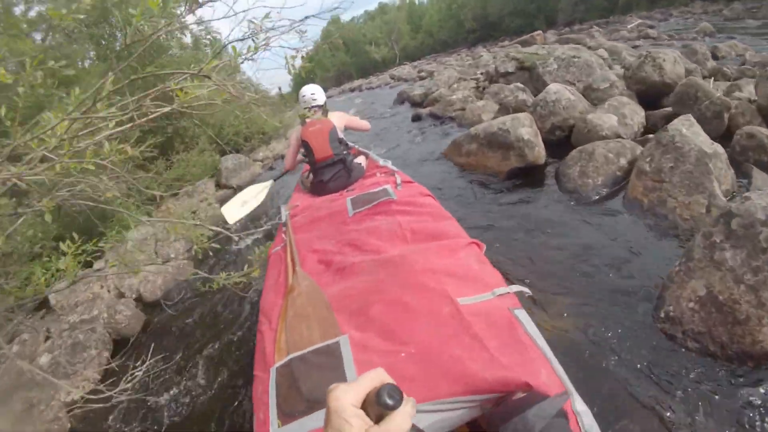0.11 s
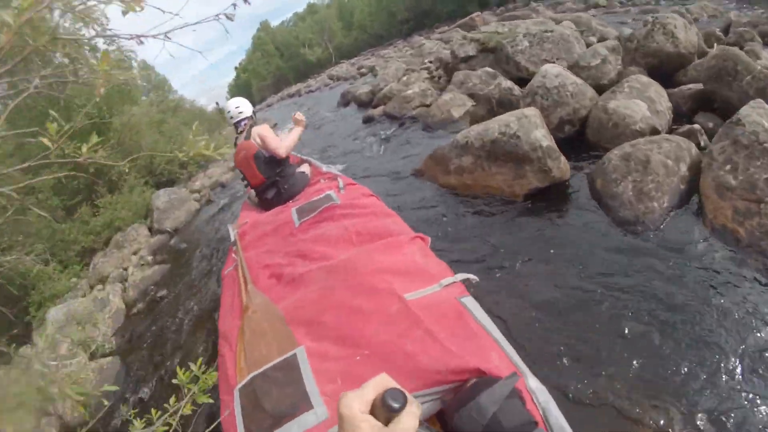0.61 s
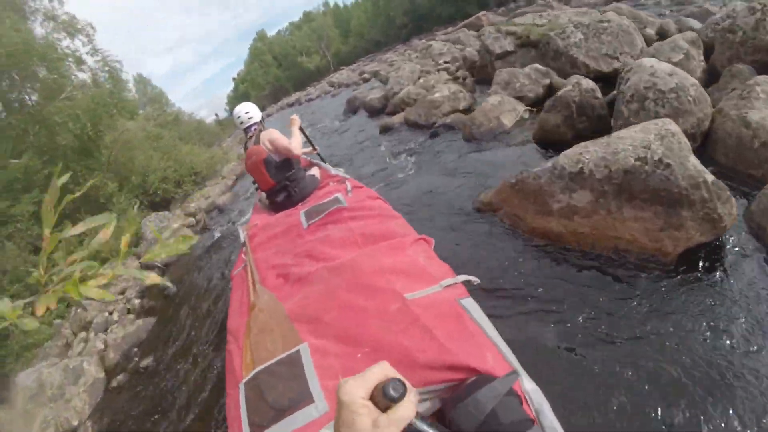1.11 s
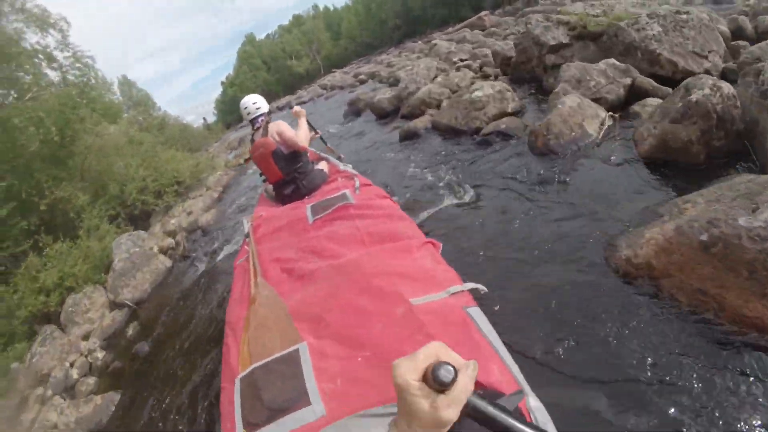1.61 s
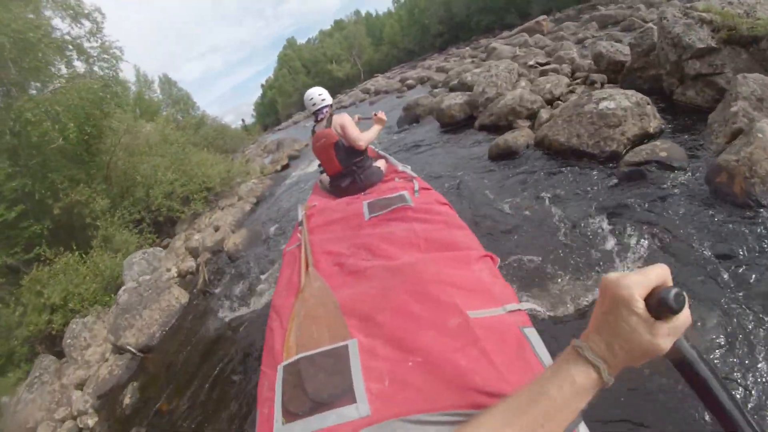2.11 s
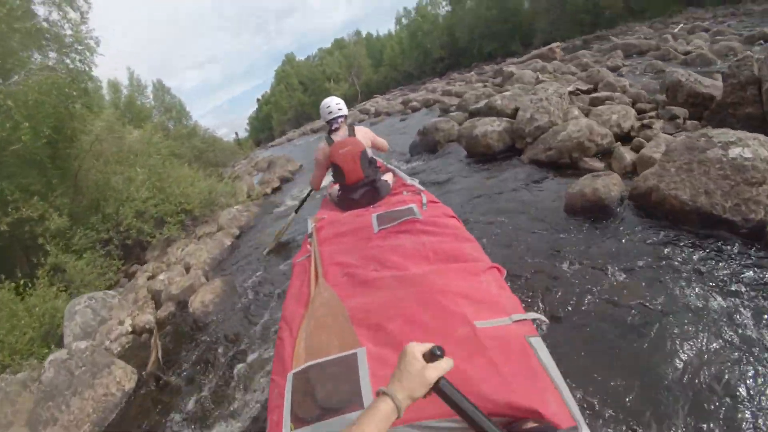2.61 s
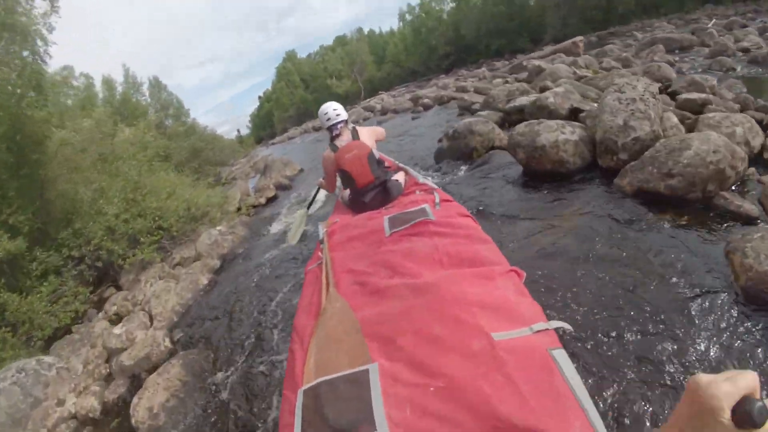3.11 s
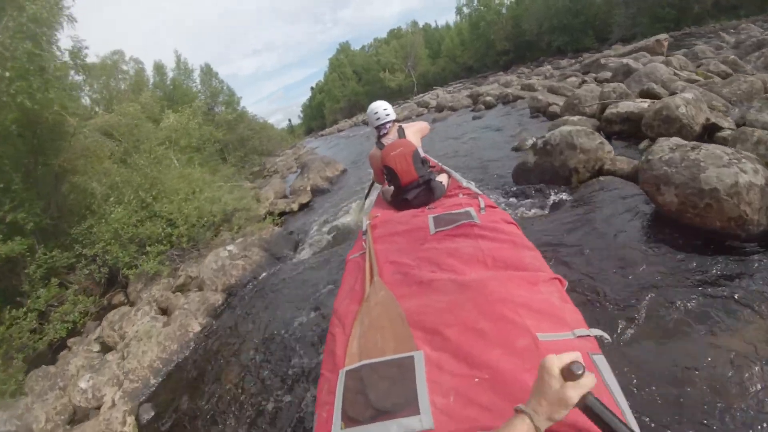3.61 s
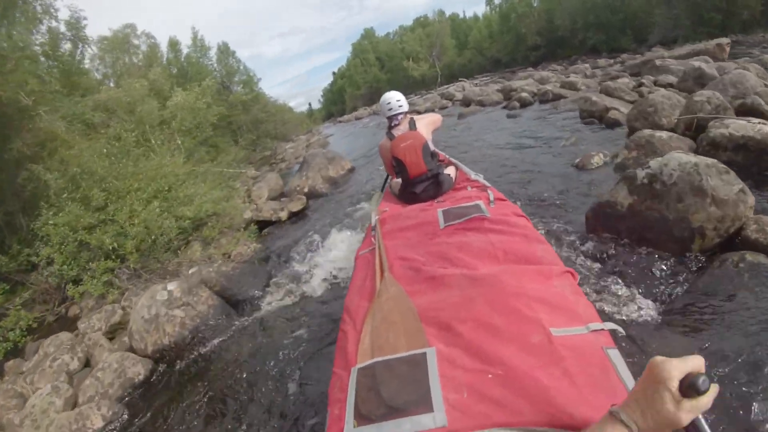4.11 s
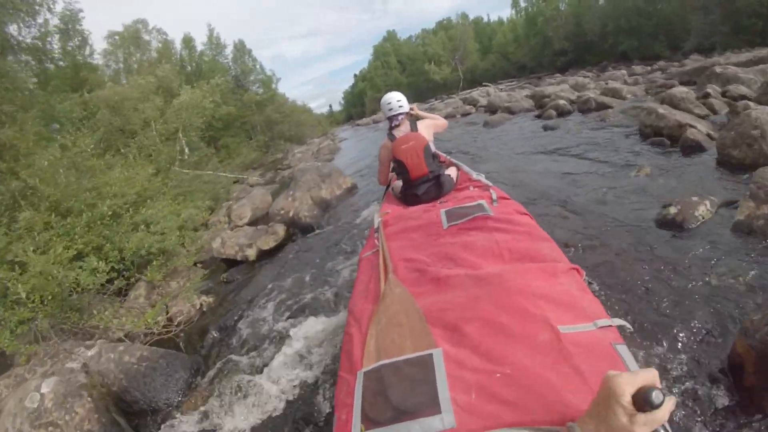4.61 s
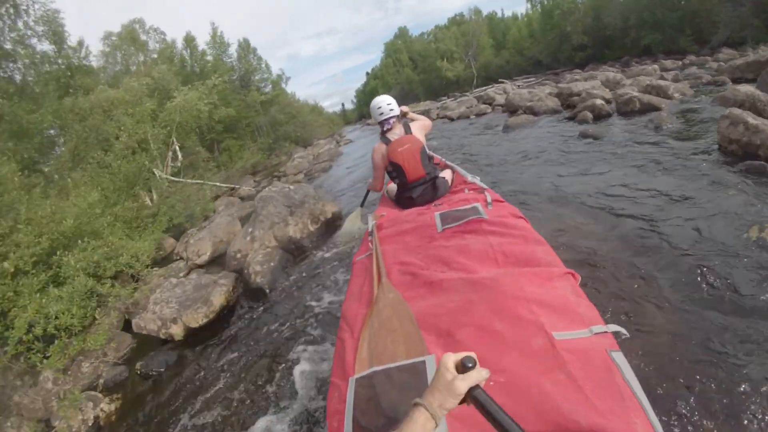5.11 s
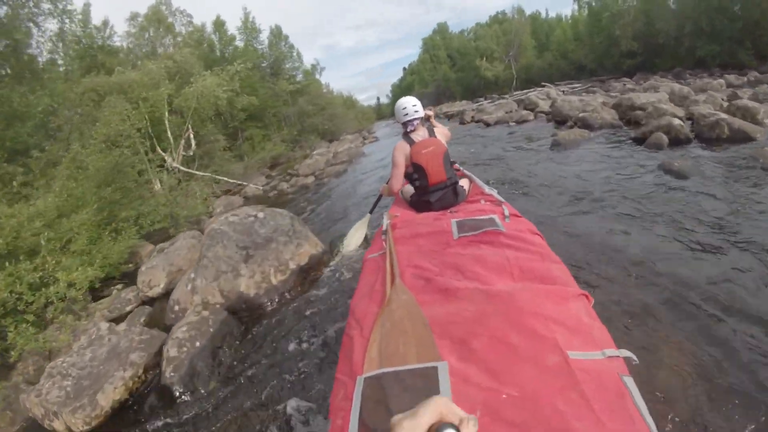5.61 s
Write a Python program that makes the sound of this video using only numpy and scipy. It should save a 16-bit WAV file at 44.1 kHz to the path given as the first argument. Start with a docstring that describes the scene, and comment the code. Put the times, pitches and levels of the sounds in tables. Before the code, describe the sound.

Fast shallow river rushes and gurgles past a canoe, with deep mount rumbles, boxy taps, gritty scrapes and leaf rustle heard from a sealed helmet case.

```python
"""A river rushes and gurgles down a rocky channel: random noise and many small rising tones make its bubbles and spray,
and brushing leaves swell the same noise at times. It is heard from a canoe, by a microphone in a sealed, ringing case
on a helmet. Head motion pumps the air in the case into deep rumbles. Twigs and gear brush, tap and bump: short bursts
of noise that ring the case and the shell. Nearby droplets are brief high tones, a soft hiss lies under it all,
and one sudden step of the wave clicks."""
import sys
import numpy as np
from scipy import signal
from scipy.fft import rfft, irfft, next_fast_len
from scipy.io import wavfile
from scipy.ndimage import uniform_filter1d, map_coordinates

SR = 44100
rng = np.random.default_rng(int(sys.argv[2]) if len(sys.argv) > 2 else 0)


def invert_db(x):
    """Field ratio 10**(x/20) for x, a level in decibels (scalar or array-like)."""
    u = np.asarray(x, float) / 20
    return 10 ** u


def unload_wav(signal):
    """Save mono or channel-first audio to the path in sys.argv[1] as 16-bit WAV at rate SR, clipped to [-1, 1]."""
    wavfile.write(
        sys.argv[1],
        SR,
        np.round(np.clip(np.atleast_2d(signal).T, -1, 1) * 32767).astype(np.int16),
    )


N = 253134  # length of the scene in samples

# Ringing tones (modes) of the case, low to high: pitch_hz, width_hz, level_db (relative)
CASE_MODES = [(554, 70, -6), (870, 420, -12.5), (1076, 98, -1), (1355, 142, 3), (1535, 165, -0.5),
              (2056, 145, -1.5), (2314, 111.4, 3.5), (2468, 161.5, 0), (3090, 137, -10.5), (3677, 740, -7),
              (4730, 880, -10), (5344, 230, -7), (6500, 800, -9), (7870, 650, -8.5), (10750, 1750, -16.5)]
# Ringing tones of the helmet shell under the case: pitch_hz, width_hz, level_db (relative)
SHELL_MODES = [(130, 36, -6.5), (221, 40, -3.5), (351, 49, -1.5)]

# Tone colours, each a curve of relative level: pitch_hz, level_db
# The river, from big bubbles to fine spray:
GURGLE_COLOUR = [(60, -15), (100, 4.5), (250, -4), (500, -9), (900, -7), (1800, -14.5), (3000, -41)]
RUSH_COLOUR = [(400, -35), (900, -3), (1400, 1.5), (2400, -1.5), (2900, 3), (4000, -10.5), (9000, -44)]
SPLASH_COLOUR = [(2000, -38), (2800, 7.5), (4000, -5), (5300, 1), (6500, -30), (9000, -48)]
SPRAY_COLOUR = [(4000, -11), (5500, 1.5), (7000, 4.5), (9000, 2.5), (12000, -1), (16000, 6.5)]
# The moving mount, from slow lean to shudder:
LEAN_COLOUR = [(4, -14), (10, 1), (19, 1), (27, -23.5), (45, -72)]
SWAY_COLOUR = [(15, -23), (24, 9), (32, 3.5), (42, -5), (60, -8), (90, -71)]
SHUDDER_COLOUR = [(25, -52), (42, 2), (60, 2.5), (80, -17.5), (120, -35.5), (250, -37.5), (500, -70)]
# The microphone:
HISS_COLOUR = [(3000, -32), (7000, 3), (10000, 6), (13000, 9), (16000, -4)]

# Strength of the rushing water, with leaf rustle swelling it near 0.7-1.15 and 2.89 s; random surges
# come on top: time_s, rush_level_db, spray_over_rush_db
FLOW = [(0.0, -63.5, -8.5), (0.4, -65.5, -7), (0.72, -57, -9), (0.95, -53.5, -8.5), (1.15, -57, -8),
        (1.27, -60, -10), (1.7, -63, -8.5), (2.05, -61, -9.5), (2.4, -59.5, -9), (2.89, -56.5, -8.5),
        (3.37, -55.5, -11), (3.7, -57.5, -12), (3.9, -55.5, -8.5), (4.12, -56.5, -9.5),
        (4.35, -53.5, -12.5), (4.8, -55.5, -10.5), (5.03, -54.5, -10), (5.74, -57.5, -13)]
# Strength of the slow lean of the head, before its random wander: time_s, level_db
MOTION = [(0.0, -41), (0.4, -37.5), (0.78, -29), (1.1, -36), (1.5, -37.5), (2.0, -38), (2.45, -34.5),
          (2.76, -24.5), (3.0, -35), (3.26, -29), (3.6, -36.5), (4.0, -34), (4.37, -29.5), (4.6, -45),
          (4.9, -33.5), (5.1, -39), (5.3, -30.5), (5.55, -47), (5.74, -37.5)]
# Jolts of the mount: peak_s, sway_level_db, shudder_over_sway_db
JOLTS = [(0.03, -53.5, -21), (0.371, -33.5, -7), (0.491, -31.5, -2), (0.64, -40, -11), (0.831, -30, -2.5),
         (1.05, -31.5, -13), (1.196, -29.5, -7.5), (1.37, -47, -4), (1.84, -47, -2), (1.98, -46, 3),
         (2.219, -40.5, -2.5), (2.49, -31, -6), (2.75, -36.5, -9.5), (2.939, -22.5, -22), (3.021, -41, 0),
         (3.099, -20, -15), (3.21, -45, 2), (3.548, -34, -17), (3.74, -44.5, 1), (3.969, -36, -5),
         (4.12, -38, -15), (4.64, -38.5, -23), (4.751, -36.5, -9), (4.971, -40.5, -7), (5.32, -46.5, -2),
         (5.691, -25, -18)]

# The touch levels below set the force; the gains of the touches and of the ringing come on top.
# Brushing strokes: start_s, force_db, low_case_modes_db (over force), top_case_modes_db (over force), length_s
BRUSHES = [(0.338, -30, -11, -17.5, 0.039), (0.3933, -35.5, -19, -14, 0.04),
           (0.4144, -37.5, -11, -12.5, 0.065), (0.467, -36, -6.5, -13, 0.04), (0.7189, -42, -24, -6, 0.033),
           (0.8063, -29.5, -8.5, -14.5, 0.049), (0.9345, -32, -8.5, -14, 0.032),
           (0.984, -33.5, -11, -14, 0.016), (1.0115, -31.5, -1.5, -15.5, 0.03),
           (1.145, -33.5, -12.5, -18, 0.025), (1.4578, -34, -2.5, -11.5, 0.026),
           (1.481, -41, -11, -28, 0.047), (1.53, -42.5, -5.5, -24, 0.024),
           (2.6197, -41.5, -10, -11.5, 0.098), (2.6801, -39, -25, -11.5, 0.032), (2.907, -40, -9, -1, 0.07),
           (2.9905, -31.5, -17, -11.5, 0.046), (3.0072, -41, -21, -1, 0.036), (3.025, -30, -6, -31, 0.026),
           (3.0518, -29, -3.5, -10.5, 0.024), (3.14, -33.5, -12.5, -13, 0.013),
           (3.2685, -45, -4, -6, 0.067), (4.596, -40.5, -25, -4.5, 0.031), (5.716, -46, -4, -21, 0.03)]
# Sharp taps: start_s, force_db, shell_db, low_case_modes_db, top_case_modes_db (last three over force)
TAPS = [(0.388, -39, -33, -8, 0), (0.6923, -41.5, -23, -2.5, -17), (0.8212, -32, -14, -15, -21),
        (0.9058, -39, -23, -11, -9), (0.934, -38.5, -12, 2, -19), (0.9491, -32, -24, -11, -17),
        (1.0308, -36, -8, -12, -18), (1.06, -33, -16, -16, -7), (1.198, -46, 3.5, 0, -16),
        (1.434, -28.5, 3.5, -7.5, -12.5), (1.4636, -17.5, -10.5, -13, -27), (1.5223, -40, 2.5, -17, -25),
        (2.8901, -6, -30.5, -21.5, -28), (2.8973, -22.5, -19, -11, -17), (2.9361, -26, -23, -29, -16),
        (3.024, -24, -33, -20, -6), (3.0524, -21, -31, -11, -40), (3.0607, -28.5, -26, -4, -28),
        (3.1802, -32.5, -14, -11.5, -13), (5.2106, -44, -20, 3, -21), (5.6482, -16, -37, -2.5, -18),
        (5.654, -18, -31.5, -9.5, -31)]
# Dull bumps: start_s, force_db, length_s
BUMPS = [(0.478, -52.5, 0.031), (0.575, -47, 0.018), (0.81, -45, 0.047), (1.017, -48.5, 0.037),
         (1.44, -39, 0.051), (1.49, -46.5, 0.05), (2.4988, -46, 0.061), (3.2685, -53, 0.06)]
# Nearby droplets, all turned down together later: start_s, level_db, pitch_hz
DROPLETS = [(2.381, -38.5, 5150), (2.803, -62, 4650), (2.859, -35, 4700), (2.9921, -43, 4530),
            (3.0774, -50, 4450), (4.0751, -44, 4590), (4.4503, -35, 6660), (4.562, -35, 6500),
            (4.597, -31.5, 4140), (4.7354, -37, 4430), (4.9403, -36, 6500), (4.979, -38, 4630),
            (5.025, -37, 4570), (5.3394, -40, 7240), (5.5523, -40, 4370), (5.5836, -33.5, 5200)]
# The one sudden step of the wave: time_s, height_db, settling_s
STEP = (3.2292, -23, 0.044)


def along(points, hz):
    """Reads a curve of (pitch, value) points, evenly by musical interval; very low outside it."""
    f, v = np.transpose(points)
    return np.interp(np.log(hz + 1), np.log(f + 1), v, left=-120, right=-120)


def unit(x):
    """Scales a sound to an average (rms) level of 1."""
    return x / np.sqrt(np.mean(x ** 2) + 1e-20)


def curves(rows):
    """Joins the table rows by straight lines: one value per sample for each column after the time."""
    s, *columns = np.transpose(rows)
    return [np.interp(np.arange(N) / SR, s, column) for column in columns]


def wobble(rate):
    """A smooth random curve through `rate` random points a second."""
    points = rng.standard_normal(int(N * rate / SR) + 4)
    return map_coordinates(points, [np.arange(N) * rate / SR])


def filtered(x, response):
    """Shapes a sound by multiplying each of its frequencies by the response there."""
    m = next_fast_len(N + 8192)
    return irfft(rfft(x, m) * response(np.fft.rfftfreq(m, 1 / SR)), m)[..., :N]


def coloured_noise(colour):
    """White noise shaped to a tone colour."""
    return filtered(rng.standard_normal(N), lambda hz: invert_db(along(colour, hz)))


def ringing(modes, hz):
    """Response of a body that rings at several pitches; a wider mode dies away sooner."""
    total = 0
    for k, (centre, width, db) in enumerate(modes):
        mode = 1j * hz * width / (centre * centre - hz * hz + 1j * hz * width)
        total = total + (-1) ** k * invert_db(db) * mode  # neighbours swing in opposite directions
    return total


def patchy(depth_db):
    """White noise whose loudness varies at random in patches of time and pitch."""
    z = signal.stft(rng.standard_normal(N), nperseg=512)[2]
    field = uniform_filter1d(rng.standard_normal(z.shape), 8, 0)
    field = uniform_filter1d(field, 8, 1)
    return signal.istft(z * invert_db(depth_db * unit(field)), nperseg=512)[1][:N]


def chirps(s, db, hz, cycles, rise):
    """Bubbles: dying tones with a soft start whose pitch rises as they surface."""
    t = np.arange(1200) / SR
    u = t * hz[:, None] / cycles  # age of the bubble: 1 after this many cycles
    envelope = np.exp(-3 * u) * (1 - np.exp(-12 * u))
    wave = invert_db(db)[:, None] * envelope * np.sin(2 * np.pi * cycles * u * (1 + rise * u))
    at = (s * SR).astype(int)[:, None] + np.arange(1200)
    return np.bincount(at.ravel(), wave.ravel(), N + 1200)[:N]


def swarm(count, centre_hz, spread, cycles):
    """Bubbles of similar size, and so of similar pitch, at random times."""
    z = rng.standard_normal((count, 2))
    hz = np.clip(centre_hz * np.exp(spread * z[:, 0]), 200, 14000)
    level_db = 3 * z[:, 1]
    return unit(chirps(rng.random(count) * N / SR, level_db, hz, cycles, rise=0.17))


def through_case(x, colour):
    """Coloured sound that rings the case; arriving from all sides, it blurs the modes."""
    smeared = [(centre, 1.22 * width, db) for centre, width, db in CASE_MODES]
    leak = 0.06  # a little passes the walls without ringing them
    return filtered(x, lambda hz: invert_db(along(colour, hz)) * (ringing(smeared, hz) + leak))


def river():
    """Bubbling water, swelled at times by leaf rustle: four layers of noise and bubble tones, large to fine."""
    surge_db = 1.11 * wobble(11) + 0.5 * wobble(35)  # shared by all layers
    gurgle = patchy(depth_db=0.95) + 0.21 * swarm(count=1500, centre_hz=653, spread=0.359, cycles=6.3)
    rush = patchy(depth_db=2.0) + 0.26 * swarm(count=3000, centre_hz=1803, spread=0.42, cycles=3.8)
    splash = patchy(depth_db=2.1) + 0.31 * swarm(count=1500, centre_hz=4080, spread=0.253, cycles=4.8)
    spray = patchy(depth_db=2.0) + 0.38 * swarm(count=1500, centre_hz=9040, spread=0.333, cycles=11)
    gurgle = filtered(gurgle, lambda hz: invert_db(along(GURGLE_COLOUR, hz)))
    rush = through_case(rush, RUSH_COLOUR)
    splash = through_case(splash, SPLASH_COLOUR)
    spray = through_case(spray, SPRAY_COLOUR)

    flow_db, spray_db = curves(FLOW)
    gurgle_db = -61 + 0.47 * (flow_db + 58)  # big bubbles follow the flow only in part
    splash_db = flow_db - 2 + 0.62 * spray_db  # middle bubbles partly follow the spray
    layers = ((gurgle_db, gurgle), (flow_db, rush), (splash_db, splash), (flow_db + spray_db, spray))
    return sum(invert_db(db + surge_db) * unit(x) for db, x in layers)


def steady(colour):
    """Coloured noise with its random swells mostly levelled, like a swinging mass."""
    x = unit(coloured_noise(colour))
    swell = np.abs(signal.hilbert(x, next_fast_len(N))[:N])
    return unit(x / (uniform_filter1d(swell, size=900) + 0.37))


def mount():
    """Head motion pumps the sealed air: a slow lean, and jolts that build and fade over a restless base."""
    build_db_per_s, fade_db_per_s = 338, 281
    uneven_db = 3  # size of the random wander
    lean_db, = curves(MOTION)
    restless_db = 0.4 * (lean_db - lean_db.mean())  # sway and shudder follow the lean in part
    sway = invert_db(-55 + restless_db + uneven_db * wobble(27))
    shudder = invert_db(-50.5 + restless_db + uneven_db * wobble(18))
    for s, db, over_db in JOLTS:
        t = np.arange(N) / SR - s
        jolt = invert_db(db - np.where(t < 0, -build_db_per_s, fade_db_per_s) * t)
        sway = sway + jolt
        shudder = shudder + invert_db(over_db) * jolt
    lean = invert_db(lean_db + uneven_db * wobble(9))
    return sway * steady(SWAY_COLOUR) + shudder * steady(SHUDDER_COLOUR) + lean * steady(LEAN_COLOUR)


def microphone_hiss():
    """The faint steady noise of the microphone."""
    return invert_db(-78) * unit(coloured_noise(HISS_COLOUR))


def contact_response(modes):
    """Ringing under a soft contact, which drives little above the top mode of its group."""
    return lambda hz: ringing(modes, hz) / (1 + 1j * hz / (1.43 * modes[-1][0])) ** 2


def contacts(rows, rise, grit_db, square, blow):
    """Each touch is a first blow and a gritty burst of force that rings four groups of modes in its own mix."""
    force = np.zeros((4, N + SR))
    t = np.arange(SR // 5) / SR
    for s, db, shell_db, low_db, top_db, length in rows:
        shape = np.minimum(t / rise, 1) * np.exp(-(t / max(length, 1e-3)) ** square)
        grit = invert_db(grit_db * np.repeat(rng.standard_normal(len(t) // 60), 60))  # roughness in small steps
        burst = shape * grit * rng.standard_normal((4, len(t)))
        burst[:, :7] = blow * np.hanning(7)
        mix_db = np.array([[shell_db], [low_db], [0], [top_db]])
        force[:, round(s * SR):][:, :len(t)] += invert_db(db + mix_db) * burst
    groups = SHELL_MODES, CASE_MODES[:5], CASE_MODES[5:9], CASE_MODES[9:]
    gains_db = [19.8, 9.7, 0.5, 6.2]
    return sum(invert_db(gain) * filtered(f[:N], contact_response(modes))
               for f, modes, gain in zip(force, groups, gains_db))


def brushes_and_bumps():
    """Strokes are long gritty bursts; dull bumps press the shell and hardly drive the top case modes."""
    rows = [(s, db, -29, low_db, top_db, length) for s, db, low_db, top_db, length in BRUSHES]
    rows += [(s, db, 0, -16, -60, length) for s, db, length in BUMPS]
    return invert_db(-1.0) * contacts(rows, rise=0.0021, grit_db=4.5, square=2.6, blow=3.4)


def taps():
    """Sharp taps: a hard first blow and a very short contact."""
    contact_s = 0.0052
    rows = [(*row, contact_s) for row in TAPS]
    return invert_db(1.0) * contacts(rows, rise=0.00039, grit_db=-2.0, square=0.98, blow=4.14)


def droplets():
    """Nearby droplets: short bubble tones, almost level in pitch."""
    s, db, hz = np.transpose(DROPLETS)
    return chirps(s, db - 4.0, hz, cycles=12.6, rise=0.013)


def sudden_step():
    """The wave drifts up, drops in one step, then settles back: a click with a low thump."""
    s, db, settle = STEP
    t = np.arange(N) / SR - s
    return -invert_db(db) / 2 * np.where(t < 0, -1, 1) * np.exp(-np.abs(t) / settle)


def scene():
    """River with leaf rustle, mount rumble, touches on case and helmet, and droplets."""
    return (river() + mount() + brushes_and_bumps() + taps() + droplets())[None]


def roll_off(x):
    """The treble ends steeply here."""
    return signal.sosfilt(signal.butter(12, 16490, fs=SR, output="sos"), x)


def record(dry):
    """Adds microphone hiss, removes all above a top pitch, then adds the sudden step."""
    top_hz = 15250
    # a short ramp to silence keeps the end from cutting off sharply in the filter
    heard = np.pad(dry + microphone_hiss(), [(0, 0), (0, SR // 10)], "linear_ramp")
    mix = filtered(heard, lambda hz: hz < top_hz) + sudden_step()
    return roll_off(mix)


dry = scene()
out = record(dry)
unload_wav(out)
```